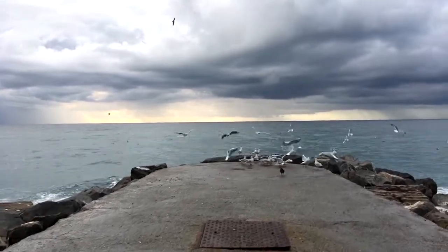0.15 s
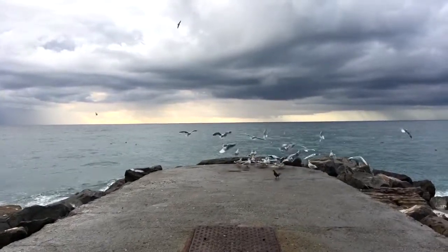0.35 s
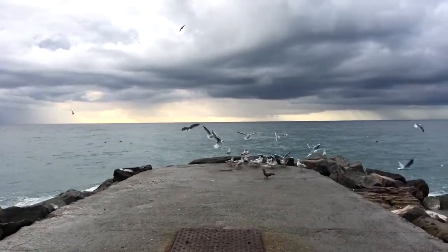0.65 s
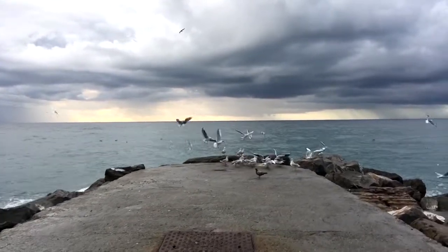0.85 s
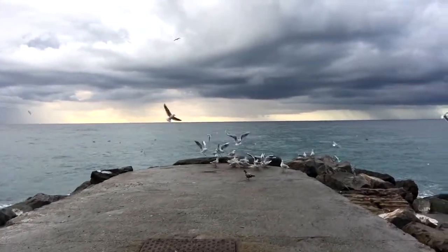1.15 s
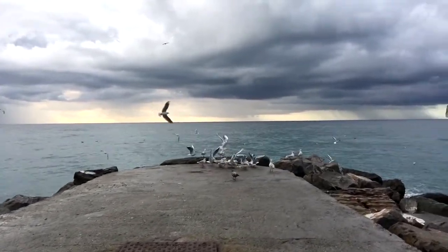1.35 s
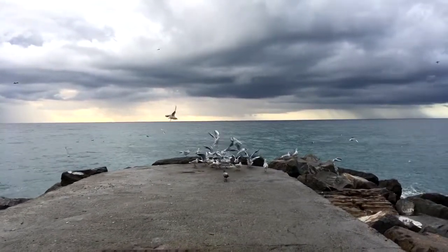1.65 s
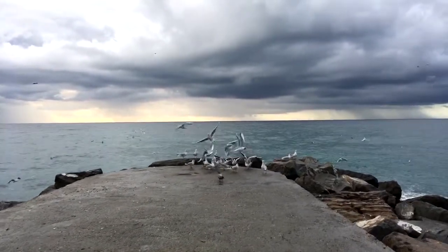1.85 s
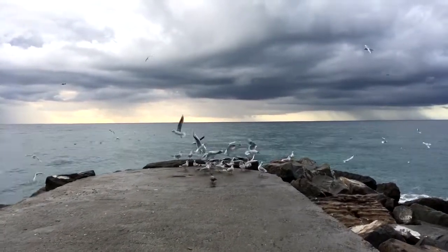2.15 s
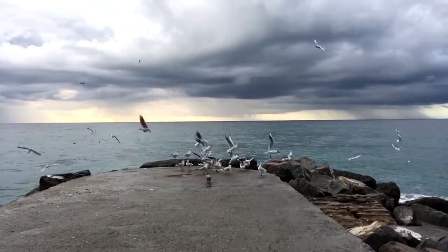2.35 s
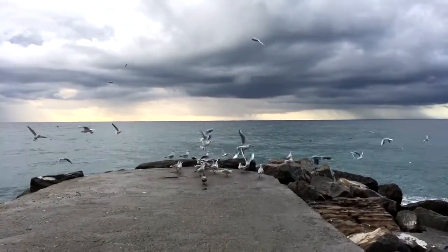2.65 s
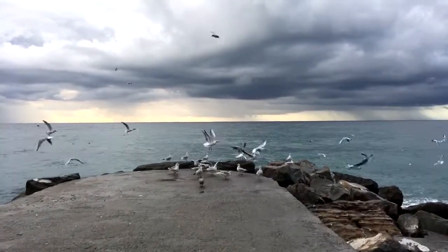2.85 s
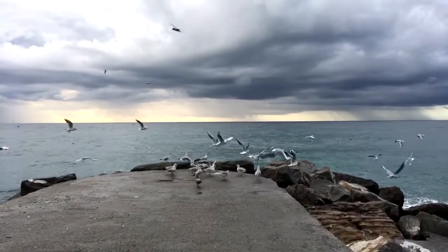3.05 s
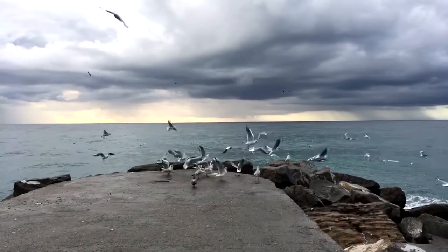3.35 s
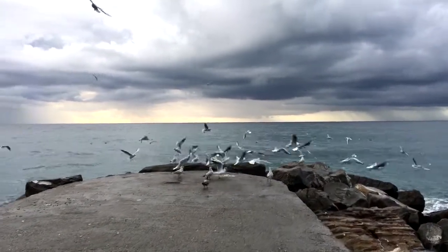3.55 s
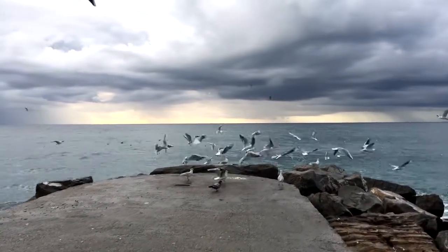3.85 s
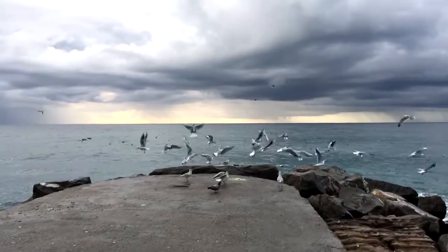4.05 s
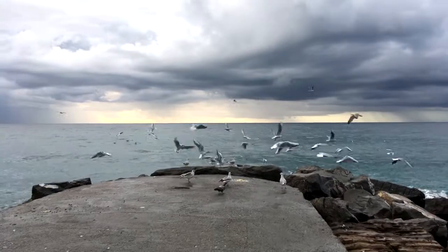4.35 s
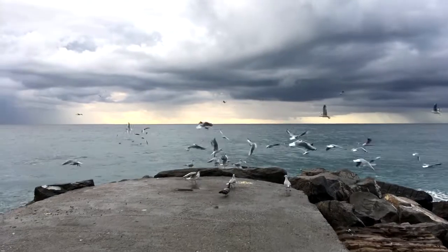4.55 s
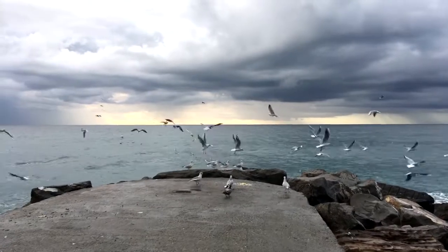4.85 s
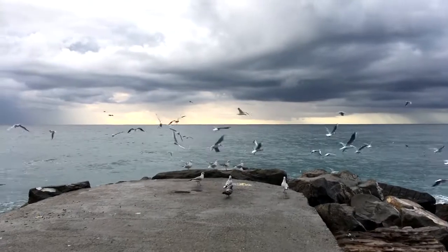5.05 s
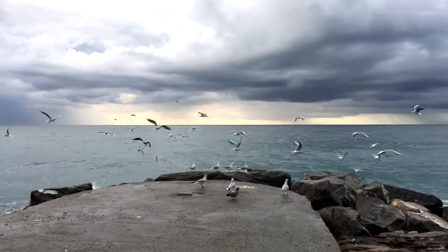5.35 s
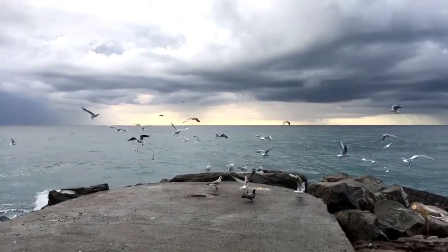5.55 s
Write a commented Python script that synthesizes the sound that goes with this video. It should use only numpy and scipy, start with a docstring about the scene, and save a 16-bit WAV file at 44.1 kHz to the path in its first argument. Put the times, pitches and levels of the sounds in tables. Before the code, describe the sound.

A flock of small gulls squabbles in quick raspy cries, thinning out over steady low wind rumble and washing surf.

```python
"""The end of a concrete breakwater, where a flock of small gulls squabbles over food.
Their short, raspy, arching cries are pulse trains shaped by resonances, thick at first, thinning as the birds
take off. Grit ticks on the concrete as struck, damped resonances; echoes and a scattered tail follow both.
Wind rumbles on the microphone and surf washes over the rocks, both as coloured noise of changing level."""
import sys
import numpy as np
from scipy import signal
from scipy.fft import rfft, irfft, next_fast_len
from scipy.io import wavfile
from scipy.ndimage import map_coordinates

SR = 44100
rng = np.random.default_rng(int(sys.argv[2]) if len(sys.argv) > 2 else 0)


def to_wav(sig):
    """Store sig (one row per channel, or 1-D mono) as 16-bit WAV at the path in sys.argv[1].

    Samples outside -1..1 are clipped; the rate is SR.
    """
    pcm = np.clip(np.atleast_2d(sig), -1, 1) * 32767
    pcm = np.round(pcm).astype(np.int16)
    wavfile.write(sys.argv[1], SR, pcm.T)  # frames by channels


N = 251370  # length in samples
TOP_HZ = 15800  # upper edge of the recorded band


def undb(db):
    """Decibels to amplitude gain: 20 dB is a factor of ten."""
    return 10 ** (np.asarray(db) / 20)


def unit(x):
    """Normalise the power: scale to rms 1."""
    return x / np.sqrt(np.mean(x ** 2) + 1e-18)


def curves(table):
    """Linear interpolation in time: the columns of a timed table as curves."""
    s, *columns = np.transpose(table)
    return [np.interp(np.arange(N) / SR, s, c) for c in columns]


def shape(x, response):
    """Linear filtering: multiply the spectrum by a gain that is a function of frequency."""
    size = next_fast_len(len(x) + 512)
    hz = np.fft.rfftfreq(size, 1 / SR) + 1  # 1 Hz up, so that no response divides by zero
    return irfft(rfft(x, size) * response(hz), size)[:len(x)]


def colour(x, points):
    """Spectral colouring: filter by (Hz, dB) points joined over log frequency; rms 1."""
    hz, db = np.transpose(points)
    return unit(shape(x, lambda f: undb(np.interp(np.log(f), np.log(hz), db))))


def resonance(f, hz, width):
    """Damped resonator: a response of gain 1 at its centre, width in Hz."""
    return 1 / (1 + 1j * (f ** 2 - hz ** 2) / (f * width))


def walk(rate, size):
    """Random modulation: smooth motion that turns about rate times a second; spread near 1."""
    steps = np.arange(size) * rate / SR + rng.random()
    return map_coordinates(rng.standard_normal(4096), [steps], order=2, mode="wrap")


def add(out, x, s):
    """Superposition: mix x into out from time s in seconds."""
    i = int(s * SR)
    x, i = x[max(-i, 0):], int(np.clip(i, 0, N - 1))
    out[i:i + len(x)] += x[:N - i]


def near_gulls(body_db=-1, throat_db=-1, shrill_db=-2, sizzle_db=-1, waver_db=3.5):
    """Source and filter: each standout cry has its own throat and share of shrill overtones and sizzle."""
    # Each row: nominal start in seconds, nominal length in seconds, pitch in Hz, glide as a share of pitch
    # over half the length, number of bursts, roughness (held to 0-1), body level in dB, throat resonance in Hz,
    # throat level in dB, beak in dB relative to the throat, overtones in dB, sizzle in dB.
    # The body, throat, overtone and sizzle levels stand before the trims in the arguments.
    cry_table = [(-.006, 0.035, 1126, 0.042, 2, 0.64, -57, 3400, -46.5, -17, -56, -56),
                 (0.032, 0.015, 1130, -.06, 1, 0.7, -55, 3350, -44.5, -14, -63, -57),
                 (0.056, .014, 1050, -.06, 1, 0.7, -57, 3150, -49.5, -14, -69, -70),
                 (0.083, 0.043, 895, 0.026, 4, 0.6, -47, 3480, -50.5, -16, -65, -70),
                 (0.122, 0.021, 897, -0.028, 2, 0.25, -49.5, 2780, -45.5, -13, -63, -72),
                 (0.166, .026, 785, -0.009, 2, 0, -51.5, 2350, -73, -21, -76, -78),
                 (0.242, 0.048, 904, 0.1, 5, 0.88, -52, 2760, -53.5, -6, -53, -58),
                 (0.264, 0.054, 850, -0.032, 1, 0.7, -52.5, 2650, -51, -3, -66, -64),
                 (0.305, 0.034, 829, .1, 2, 0.3, -45, 2720, -47.5, -9, -68, -60),
                 (0.332, 0.019, 1234, -.02, 1, 0.25, -50, 3650, -47.5, -18, -67, -60),
                 (0.351, 0.045, 886, .02, 3, .6, -49, 2740, -46, -10, -60, -66),
                 (0.388, .02, 837, -.09, 1, .35, -48, 2500, -58, -16, -74, -74),
                 (0.427, 0.032, 672, .02, 1, 0.44, -45, 1980, -65, -21, -76, -62),
                 (0.458, 0.025, 633, -0.055, 2, 0.54, -47.5, 1900, -64, -23, -76, -68),
                 (0.513, 0.017, 958, 0.092, 1, .45, -60, 3150, -46.5, -1, -67, -54),
                 (0.533, 0.017, 852, 0.05, 1, 0.3, -47, 3240, -42, -7, -57, -47.5),
                 (0.554, .015, 870, -0.081, 1, 0.4, -42.5, 3270, -43, -6, -58, -49.5),
                 (0.569, 0.011, 750, -0.053, 1, .3, -44, 2900, -55, -16, -68, -58),
                 (0.581, 0.042, 806, 0.029, 1, 0.35, -52, 2450, -58.5, -23, -63, -62),
                 (0.691, 0.051, 894, -0.019, 3, 0.28, -55, 3500, -55, 3, -58, -62),
                 (0.705, 0.017, 1077, 0.023, 1, 0.6, -60, 5400, -49, -8, -66, -70),
                 (0.725, 0.046, 790, -0.022, 2, 0.37, -45, 2450, -58, -14, -71, -72),
                 (.768, .04, 860, -0.039, 2, .5, -44, 2600, -56, -6, -61, -64),
                 (.798, 0.033, 780, -0.097, 3, .6, -42.5, 2300, -57, -16, -70, -70),
                 (0.862, .038, 943, -0.014, 1, 0.44, -46, 2850, -51, -18, -55, -72),
                 (0.92, 0.033, 861, -0.03, 1, 0.3, -50, 2610, -55, -7, -65, -74),
                 (0.998, 0.038, 1040, -0.01, 1, 0.78, -48.5, 2800, -52.5, -20, -56, -68),
                 (1.023, 0.018, 810, -0.056, 1, 0.25, -46, 2900, -54, -20, -70, -74),
                 (1.078, 0.045, 1112, -.02, 3, 0.5, -54, 3050, -53, -9, -52, -59),
                 (1.15, 0.045, 1140, 0.028, 1, .35, -65, 4500, -62, -20, -68, -70),
                 (1.194, .05, 932, -0.021, 1, 0.32, -51, 2850, -57, -3, -61, -54),
                 (1.251, .04, 847, 0.033, 1, 0.5, -47.5, 2550, -60, -23, -72, -74),
                 (1.259, 0.014, 1270, 0.037, 1, .25, -61, 3850, -54, -20, -62, -68),
                 (1.277, 0.035, 1140, -0.0021, 2, 0.26, -50, 3550, -49.5, -2, -59, -68),
                 (1.344, 0.042, 1147, -0.074, 2, 0.64, -54, 3200, -52.5, -18, -66, -64),
                 (1.385, .026, 798, -.03, 1, 0.6, -55, 2500, -60, -14, -72, -74),
                 (1.413, 0.04, 878, .01, 2, 0.34, -54, 2600, -51.5, -1, -61, -66),
                 (1.458, 0.028, 843, -.05, 2, 0.35, -53, 2550, -55, -8, -69, -70),
                 (1.543, 0.038, 1080, -0.066, 2, 0.5, -50.5, 3300, -55.5, -8, -63, -68),
                 (1.612, 0.02, 1146, 0.035, 1, .7, -53, 3600, -55, -14, -61, -64),
                 (1.63, 0.048, 938, -0.01, 1, 0.5, -53, 2720, -45, -25, -55, -57),
                 (1.709, 0.054, 1100, -0.039, 1, 0.7, -57, 3850, -56.5, -11, -58, -58),
                 (1.761, 0.032, 980, 0.061, 1, 1.06, -53, 3080, -50.5, -9, -54.5, -55),
                 (1.855, 0.049, 1170, -0.01, 1, 0.6, -43.5, 3380, -51.5, -27, -48, -55),
                 (1.874, .03, 804, -.05, 2, 0.86, -50, 2400, -48, -20, -66, -68),
                 (1.905, .026, 855, -0.087, 1, 0.55, -53, 2580, -58, -27, -68, -68),
                 (2.034, .022, 780, 0.097, 1, 0.7, -47, 3020, -49.5, -10, -53.5, -58),
                 (2.051, .033, 934, -0.084, 1, 0.57, -46.5, 3400, -53, -20, -63, -66),
                 (2.157, 0.043, 994, -0.081, 1, 0.28, -48, 3080, -55, -27, -63, -72),
                 (2.232, 0.039, 1076, -0.044, 1, 0.66, -59, 3320, -58, -12, -53.5, -59),
                 (2.286, 0.04, 844, -0.046, 1, 0.5, -44, 2600, -70, -23, -72, -78),
                 (2.38, 0.026, 791, -0.055, 1, 0.3, -52.5, 2400, -68, -23, -76, -80),
                 (2.487, 0.017, 954, 0.068, 1, 0.6, -49.5, 2800, -64, -20, -62, -78),
                 (2.598, .038, 790, 0.089, 1, 0.6, -51.5, 2500, -60, -16, -64, -75),
                 (2.692, .025, 817, -.04, 1, 0.6, -60, 2400, -62, -20, -72, -76),
                 (2.782, 0.05, 963, -.05, 1, 0.5, -52.5, 2900, -60, -20, -57.5, -64),
                 (3.068, 0.039, 811, -0.064, 1, 0.67, -54, 2290, -53.5, -5, -72, -80),
                 (3.101, 0.022, 657, -0.092, 1, 0.6, -50, 2000, -66, -16, -81, -80),
                 (3.162, 0.025, 765, 0.068, 2, 0.2, -50, 2300, -74, -23, -74, -84),
                 (3.369, 0.047, 880, -0.045, 1, 0.54, -50, 2780, -57, -21, -59, -64),
                 (3.541, .018, 850, 0.11, 1, .3, -62, 2580, -56, -24, -76, -76),
                 (3.727, 0.031, 1226, 0.036, 3, 0.77, -49.5, 3660, -47, -12, -58, -59),
                 (3.755, 0.013, 1045, -0.034, 1, 0.2, -52, 3250, -43, -14, -58, -59),
                 (3.766, .011, 826, -.05, 1, 0.4, -48, 3200, -52, -14, -65, -68),
                 (4.028, 0.054, 1387, 0.015, 1, 0.8, -64, 4000, -55, -14, -75, -69),
                 (4.041, 0.0091, 1130, -0.11, 1, 0.2, -49, 2400, -50.5, -14, -70, -62),
                 (4.052, 0.031, 824, -0.0055, 2, 0.23, -50.5, 2400, -48, -12, -66, -61),
                 (4.312, 0.02, 915, 0.044, 1, 0.65, -54, 2800, -47.5, -26, -60, -65),
                 (4.337, 0.016, 826, -0.04, 1, .2, -52, 2800, -44.5, -31, -58.5, -58),
                 (4.356, 0.012, 796, -0.087, 1, 0.7, -52, 2500, -47, -25, -63, -68)]
    # Spectra of the upper registers of the voice. Each row: frequency in Hz, relative level in dB.
    shrill_spectrum = [(2500, -102), (4300, -5.5), (4950, -2), (5500, 4), (6600, 1.5), (7500, -5.5),
                       (9300, -1.5), (10500, -11), (13000, -44)]
    sizzle_spectrum = [(8000, -31), (10500, -6), (11400, 2.5), (12700, 4), (14000, 0), (15500, -3)]
    out = np.zeros(N)
    for s, length, hz, glide, bursts, rough, low, throat_hz, ring, beak, overtones, sizzle in cry_table:
        x = syrinx(length, hz, glide, np.clip(rough, 0, 1), round(bursts))
        registers = [undb(low + body_db) * body(x, hz),
                     undb(ring + throat_db) * throat(x, throat_hz, beak),
                     undb(overtones + shrill_db) * colour(x, shrill_spectrum),
                     undb(sizzle + sizzle_db) * colour(x, sizzle_spectrum)]
        # the registers waver in level at random, each on its own, so the timbre flickers within a cry
        cry = sum(part * undb(waver_db * np.tanh(walk(58.0, len(x)))) for part in registers)
        add(out, cry, s - length / 8)  # a faded margin stands before the nominal start
    return out


def far_gulls(count=33, db=-59.5, busy_s=1.85, throat_hz=2900, throat_db=-2):
    """Source and filter again: fainter birds in the huddle fill the gaps until the flock lifts."""
    out = np.zeros(N)
    for i, (when, length, pitch, ring, loud) in enumerate(rng.uniform(-1.0, 1, (count, 5))):
        hz = 860 + 170 * pitch
        x = syrinx(0.059 + 0.0136 * length, hz, glide=-0.0315, rough=0.44, bursts=1 + i % 3)
        cry = body(x, hz) + undb(throat_db) * throat(x, throat_hz * 1.34 ** ring)
        add(out, undb(db + 2 * loud) * cry, busy_s * (i + 1 + when) / count)
    return out


def syrinx(length, hz, glide, rough, bursts=1, wobble=0.0128, rasp_db=3.0, flutter_hz=190,
           split=0.54, edge=0.045, taper=0.95):
    """Self-oscillation: membranes slap at an arching pitch; a forced cry breaks into a quick run of bursts."""
    # how far loudness and pitch drop where the voice catches between bursts (shares)
    catch_dip, catch_sag = 0.92, 0.09
    size = int(length * 1.25 * SR)
    u = np.linspace(-1, 1, size)

    # the voice nearly stops and its pitch drops at each catch, so each burst has a small arch of its own
    progress = np.clip((1.25 * u + 1) / 2, 0, 1)
    # the bursts are uneven in length, and tend to lengthen as the cry goes on
    uneven = np.sin(np.pi * progress) * (.1 + .12 * walk(45, size))
    catch = np.cos(np.pi * (round(bursts) * progress + uneven)) ** 2 * (bursts > 1)
    catch = catch * np.clip(.95 + .15 * walk(60, size) - .15 * u ** 2, 0, 1)

    arch = -.17 * (u ** 2 - 1 / 8)
    contour = 1 + glide * u + arch - catch_sag * (catch - catch.mean() / 2)
    jitter = .033 * rough * walk(800, size) + .03 * rough * walk(130, size)
    pitch = hz * (contour + jitter + wobble * walk(95.3, size))
    phase = 2 * np.pi * np.cumsum(pitch) / SR

    k = np.arange(1, int(TOP_HZ / hz) + 2)[:, None]  # harmonic numbers
    pulses = unit(np.cos(k * phase + rng.uniform(0, 1.8, k.shape)).sum(axis=0))
    # the two sides of the syrinx beat against each other and throw sidebands between the harmonics
    pulses = pulses * (1 + 2 * split * rough * np.cos(phase * rng.uniform(.25, .5)))
    # air bursts through once a cycle
    hiss = 1.2 * rough ** 2 * unit(rng.standard_normal(size) * (1 + np.cos(phase)))

    rasp = undb(rasp_db * rough * np.tanh(walk(flutter_hz, size)))
    stutter = rasp * (1 - catch_dip * catch ** 3)
    fades = np.sin(np.pi / 2 * np.clip((1 - abs(u)) / edge, 0, 1)) ** 2
    swell = fades * np.exp(-taper * u ** 2)
    return (pulses + hiss) * stutter * swell


def body(x, pitch, width=700, low_hz=1050, centre=1.56):
    """Band-pass resonance: the low part gathers just under the second harmonic; the fundamental stays dark."""
    def response(f):
        skirts = (1 + (low_hz / f) ** 12) * (1 + (f / (2.4 * pitch)) ** 20)
        return abs(resonance(f, centre * pitch, width)) / np.sqrt(skirts)
    return unit(shape(x, response))


def throat(x, hz, beak_db=-23, width=1150, beak_hz=4100, beak_width=600, high=1.35):
    """Formants: the windpipe picks out one or two higher harmonics; the open beak adds a ring of its own."""
    def response(f):
        skirts = (1 + (.75 * hz / f) ** 12) * (1 + (f / (high * hz)) ** 20)
        windpipe = abs(resonance(f, hz, width)) ** 2 / np.sqrt(skirts)
        beak = undb(beak_db) * abs(resonance(f, beak_hz, beak_width)) ** 2
        return windpipe + beak
    return unit(shape(x, response))


def grit(crunch_hz=13000, crunch_width=8000, crush_s=0.00062):
    """Damped impact: small stones knock on the concrete, and a bright crunch builds as they grind."""
    # Each row: start in seconds, peak of the knock in dB, its resonance in Hz, decay by 60 dB in seconds,
    # peak of the bright crunch in dB relative to the knock.
    grit_table = [(1.525, -40, 6000, 0.0076, 10), (1.910, -39, 3000, .02, 3),
                  (2.885, -39, 3020, 0.011, -13), (3.389, -45.5, 4500, 0.056, 15),
                  (3.416, -39, 5000, 0.01, 11), (3.468, -27, 1620, 0.0088, -17),
                  (3.568, -44.5, 2740, 0.051, 10.5)]
    out, t = np.zeros(N), np.arange(4096) / SR
    for s, db, hz, t60, crunch_db in grit_table:
        burst = rng.standard_normal(len(t)) * np.exp(-np.log(1000) * t / t60)
        knock = shape(burst, lambda f: resonance(f, hz, hz / 2) * resonance(f, hz, 2 * hz))
        grinding = burst * (1 - np.exp(-t / crush_s))
        crunch = shape(grinding, lambda f: resonance(f, crunch_hz, crunch_width))
        click = knock / abs(knock).max() + undb(crunch_db) * crunch / abs(crunch).max()
        add(out, undb(db) * click, s)
    return out


def rocks(x, tail_db=-20, t60_s=0.27):
    """Reflection and scattering: early echoes and a thin scatter from the boulders, dull in the treble."""
    # Echoes off the concrete and the rocks. Each row: delay in seconds, level in dB ahead of the dulling.
    echo_table = [(.011, -17), (0.025, -28)]
    t = np.arange(SR // 2) / SR
    response = rng.standard_normal(len(t)) * np.exp(-np.log(1000) * t / t60_s)
    response *= undb(tail_db) / np.linalg.norm(response)
    for delay, db in echo_table:
        response[int(delay * SR)] += undb(db)
    reflected = signal.fftconvolve(x, response)[:N]
    return shape(reflected, lambda f: 1 / (1 + 1j * f / 6000))


def surf(wash_db=4.0, spray_db=3.0, churn_db=0.74, fizz_db=1.0, roar_hz=370, roar_width=240):
    """Turbulent noise: water washes round the rocks, foam fizzes above, a swell roars low as it rolls in."""
    # Each row: time in seconds, wash level in dB, spray level in dB, both before the trims in the arguments.
    surf_table = [(0.0, -51, -62), (1.29, -48, -57.5), (1.94, -48.5, -56), (2.32, -49, -57.5),
                  (2.67, -47.5, -57.5), (3.79, -52.5, -63.5), (4.82, -53, -62.5), (5.33, -49.5, -59.5),
                  (5.7, -49.5, -56)]
    # Each row: time in seconds, level of the roar in dB.
    swell_table = [(0, -64), (2, -59), (3, -55.5), (4, -57.5), (5.2, -56), (5.7, -49)]
    # Spectra of the wash and the spray. Each row: frequency in Hz, relative level in dB per Hz.
    wash_spectrum = [(130, -0.5), (300, 6.5), (450, 0.5), (650, 1.04), (1100, -2.5), (1700, -7),
                     (2600, -12), (3800, -20.5), (5000, -31), (8000, -28)]
    spray_spectrum = [(1000, -13), (2500, 8), (4000, 5), (4900, 2.5), (5700, 5.5), (6600, 4), (7700, -2),
                      (9600, 2.5), (10500, -3.5), (11500, 1.5), (14000, 2), (16000, 0)]
    wash_level, spray_level = curves(surf_table)
    swell_level, = curves(swell_table)
    wash = colour(rng.standard_normal(N), wash_spectrum)
    wash = wash * undb(wash_db + wash_level + churn_db * walk(20, N))
    spray = colour(rng.standard_normal(N), spray_spectrum)
    spray = spray * undb(spray_db + spray_level + fizz_db * walk(35, N))
    roar = unit(shape(rng.standard_normal(N), lambda f: resonance(f, roar_hz, roar_width) ** 2))
    return wash + spray + roar * undb(swell_level)


def wind(db=-0.34, buffet_db=1.18, deep_hz=110, deepening=0.7, usual_db=-37):
    """Turbulent pressure: eddies buffet the microphone; stronger gusts reach deeper."""
    # Strength of the wind. Each row: time in seconds, level in dB before trim and buffeting.
    gust_table = [(0.0, -39), (0.33, -38.5), (0.35, -41.5), (1.2, -37), (1.55, -34.5), (2.08, -32.5),
                  (2.3, -38.5), (2.71, -36.5), (2.98, -39.5), (3.38, -37), (4.46, -43), (5.48, -40.5),
                  (5.52, -35.5), (5.7, -41.5)]
    # Spectrum of the eddies. Each row: frequency in Hz, relative level in dB per Hz.
    eddy_spectrum = [(15, -42), (25, -47), (31, -21), (38, -18), (50, -5), (67, -1.5), (88, -3.5),
                     (110, -4.5), (160, -4), (210, -7), (260, -15), (340, -24), (450, -28.5), (700, -56)]
    gust_db, = curves(gust_table)
    eddies = colour(rng.standard_normal(N), eddy_spectrum)
    deep = shape(eddies, lambda f: 1 / (1 + (f / deep_hz) ** 4))
    rumble = eddies + deep * (undb(deepening * (gust_db - usual_db)) - 1)
    return unit(rumble) * undb(db + gust_db + buffet_db * walk(18, N))


def scene():
    """Superposition: birds and grit with their reflections among the rocks, over wind and sea."""
    direct = near_gulls() + far_gulls() + grit()
    return (direct + rocks(direct) + wind() + surf())[None]


def record(dry):
    """Band limiting: the recorder cuts the top steeply with an elliptic low-pass."""
    return signal.sosfilt(signal.ellip(10, .2, 80, TOP_HZ, fs=SR, output="sos"), dry)


dry = scene()
out = record(dry)
to_wav(out)
```